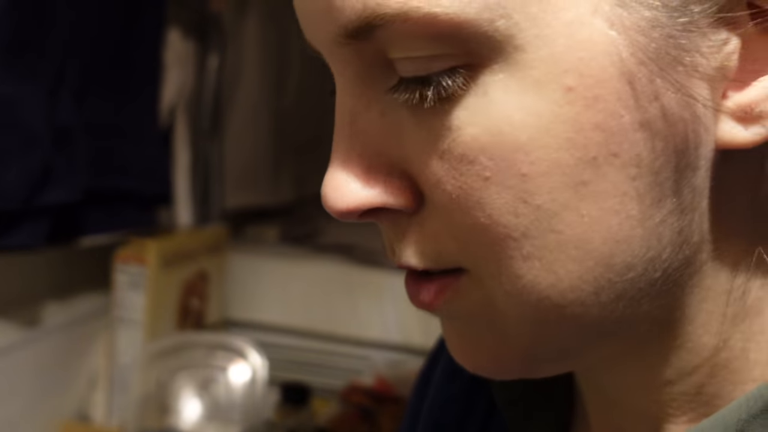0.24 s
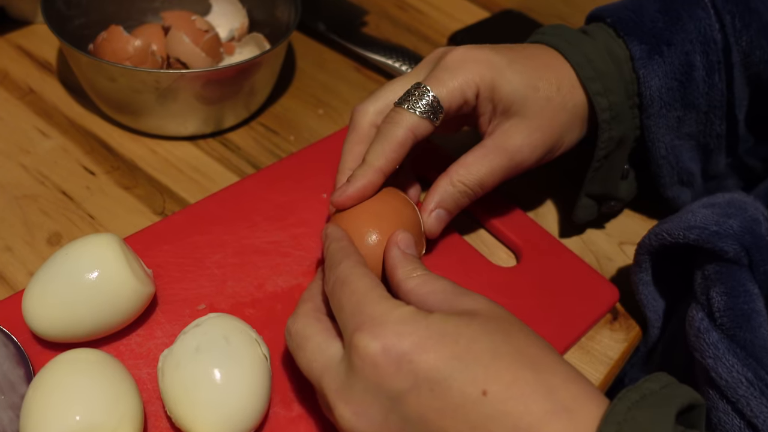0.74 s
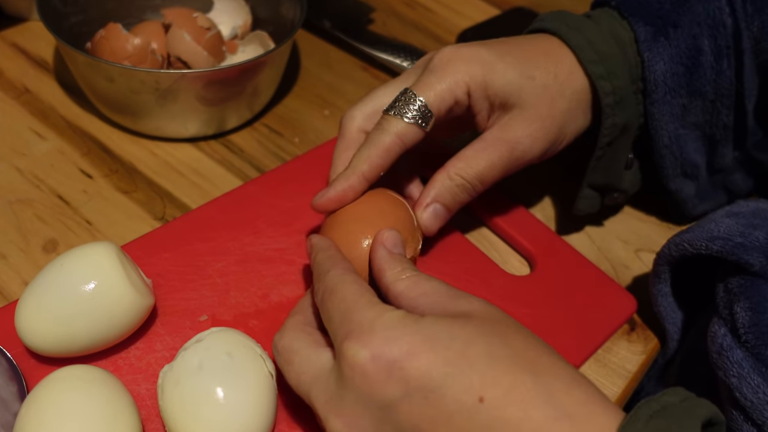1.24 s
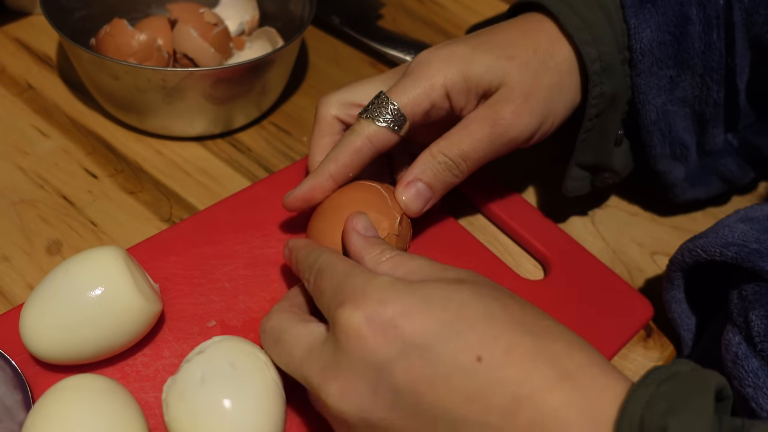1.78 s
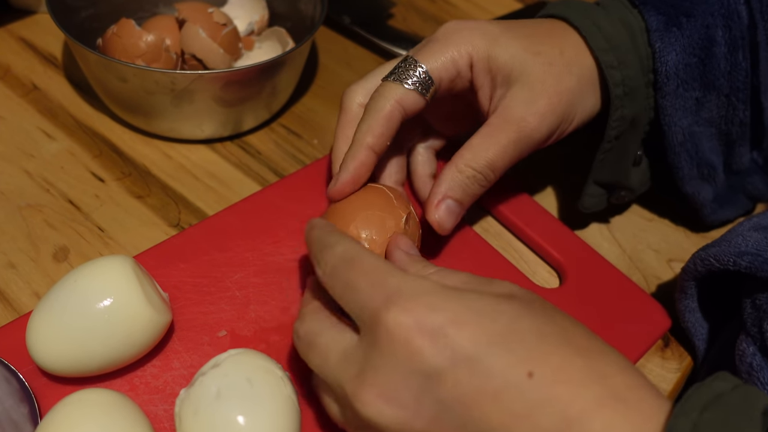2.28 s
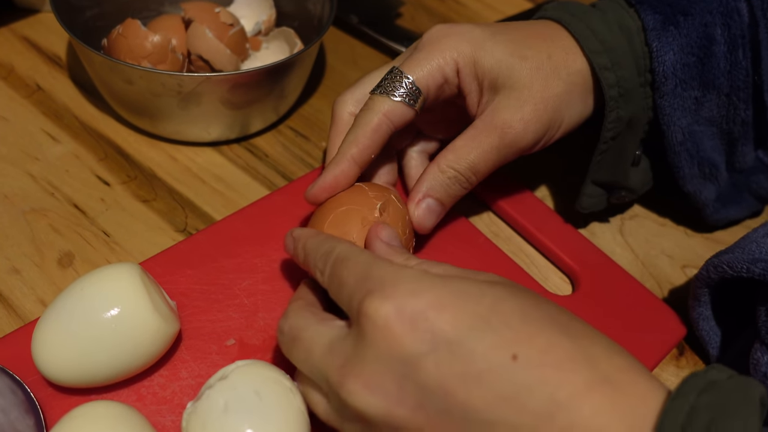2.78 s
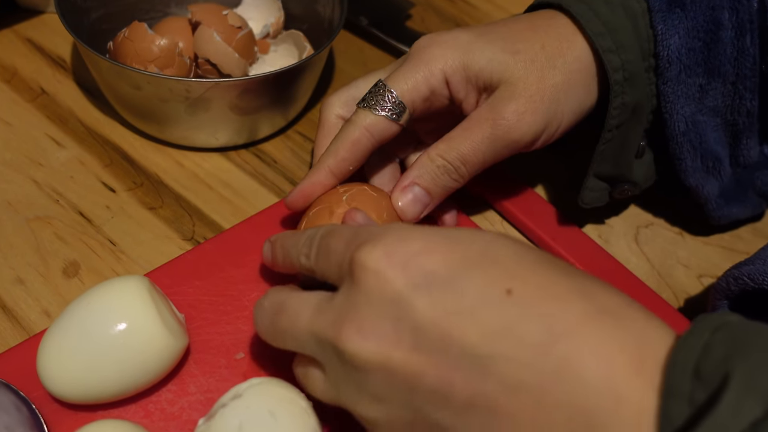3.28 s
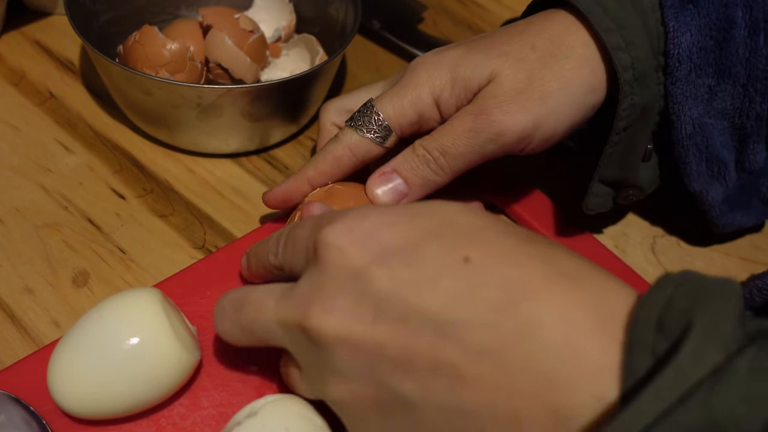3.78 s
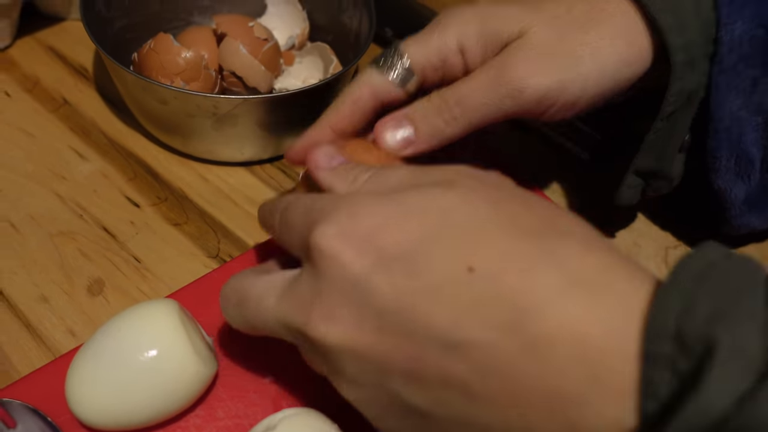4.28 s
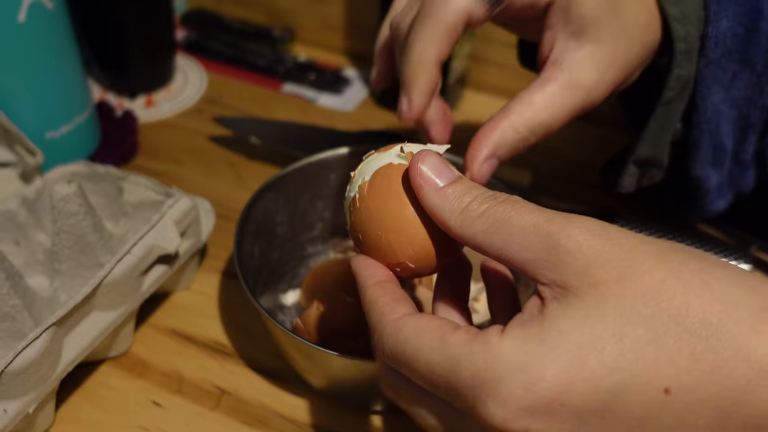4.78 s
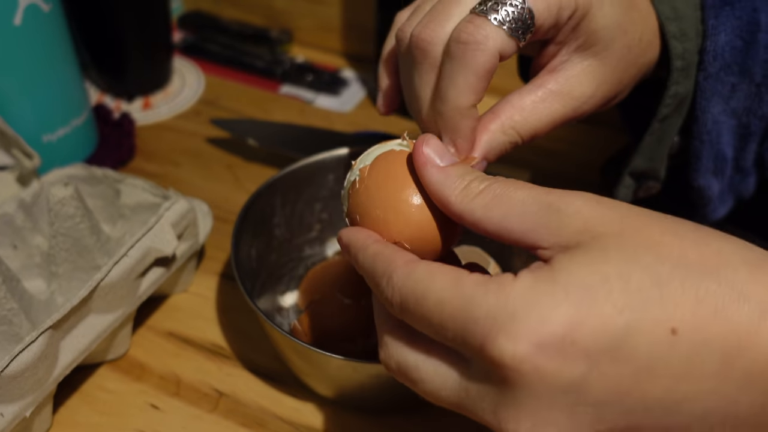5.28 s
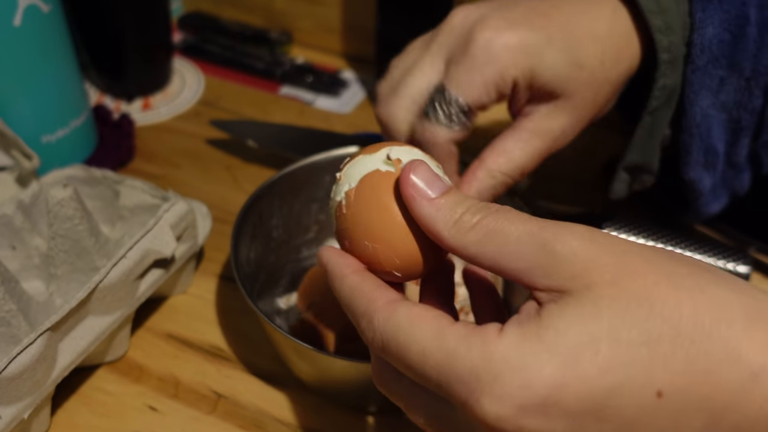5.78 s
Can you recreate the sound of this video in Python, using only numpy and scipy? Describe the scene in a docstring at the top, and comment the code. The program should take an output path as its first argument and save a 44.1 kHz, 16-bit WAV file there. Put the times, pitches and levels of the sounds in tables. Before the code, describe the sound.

Close, dry cracking of a hard-boiled eggshell pressed and rolled on a plastic board, with dull knocks, then delicate peeling ticks over low kitchen rumble.

```python
"""In a small kitchen a hard-boiled egg is pressed and rolled on a plastic cutting board. Its shell cracks in steps:
bursts of noise through the shell's resonances, with decaying sines for the knocked board and the thumped table.
Shell grinds and crunches as many tiny clicks, and one skid groans as a sine of uneven pitch. Then fingers peel
the shell off with thin ticks and small rips of filtered crackle. Filtered noise makes a low rumble and thin air,
and a wavering sine hums faintly. All sound drops out for a moment early on."""
import sys
import numpy as np
from scipy import signal
from scipy.fft import rfft, irfft, next_fast_len
from scipy.io import wavfile
from scipy.ndimage import uniform_filter1d, map_coordinates

SR = 44100
rng = np.random.default_rng(int(sys.argv[2]) if len(sys.argv) > 2 else 0)


def pcm_store(signal):
    """Save signal as 16-bit PCM."""
    levels = np.round(np.clip(np.atleast_2d(signal), -1, 1) * 32767)
    wavfile.write(sys.argv[1], SR, levels.astype(np.int16).T)


N = 266805
TIME = np.arange(N) / SR  # [s]
AGE = np.arange(8192) / SR  # time since a blow [s]
REFERENCE_DB = -30  # strength at which the snap and crunch levels are given

# breaks of the shell: (time [s], strength [dB], brightness [dB per octave])
BREAKS = [(0.1971, -48.5, -1.5), (0.265, -56.5, 7), (0.3184, -57, 11), (.5, -33.5, -6), (0.548, -54.5, 1.5),
          (0.648, -53, -2), (0.896, -49.5, 11), (0.9105, -30.5, -2), (.926, -29, 2.5), (.932, -35, 8.5),
          (0.9523, -36, 0.5), (0.9865, -42, 5.5), (1.0428, -56.5, 7.5), (1.1123, -21.5, -2),
          (1.1475, -38.5, -0.5), (1.1723, -45, 5.5), (1.1921, -28, -2.5), (1.1982, -34.5, 4),
          (1.212, -41.5, 6), (1.4147, -28, 1.5), (1.4269, -37, -2), (1.44, -32.5, -2), (1.4563, -35, -2),
          (1.4635, -33, 2), (1.6161, -56.5, 7.5), (1.6403, -50, 1.5), (1.6714, -49, 1.5), (1.6982, -58, -6),
          (1.7153, -47.5, -6), (1.766, -53.5, -1), (1.8091, -28.5, -2), (1.829, -35, -1.5),
          (1.8473, -48.5, 6), (1.8987, -37.5, -3.5), (2.3239, -55.5, -6), (2.373, -36, -1.5),
          (2.4633, -65, 13), (2.558, -44, 8.5), (2.6023, -43, 2), (2.6937, -25.5, 1.5), (2.7527, -32, 0),
          (2.7777, -58.5, 13.5), (2.829, -49.5, 10.5), (2.8613, -55, 4), (2.8957, -27.5, 0),
          (2.9022, -27, 2), (2.9913, -53, 5), (3.1181, -34, 3.5), (3.1206, -25, -0.5), (3.1793, -34.5, -1),
          (3.2195, -39, 0), (3.269, -48, 5), (3.2944, -25, -1.5), (3.3055, -35, 8), (3.396, -32.5, 1),
          (3.4106, -28.5, -3), (3.5198, -29.5, -1), (3.5486, -46.5, 10), (3.5959, -26.5, 2.5),
          (3.6621, -47, 4), (3.711, -44, 4), (3.7979, -34.5, 3.5), (3.8194, -29, 0), (3.8694, -32, 9),
          (3.8767, -30.5, -11), (3.976, -57.5, 7), (4.0106, -35.5, 3.5), (4.0527, -41.5, 6),
          (4.1019, -30, -0.5), (4.1195, -35.5, 6), (4.197, -52.5, 10.5)]
# the shell caves in and the egg sinks against the board: (time [s], level [dB])
CAVE_INS = [(.926, -24.5), (1.427, -26.5), (1.6716, -37), (1.813, -19.5), (2.697, -15.5), (3.18, -19),
            (3.408, -19), (3.6, -20), (3.664, -31.5), (3.875, -15), (4.119, -17)]
# the egg tips onto its side: (start [s], end [s])
TIPPING = (1.5, 2.6)
# sound of thin shell and membrane: (frequency [Hz], relative level [dB per Hz])
THIN_SHELL = [(3000, -22.5), (5000, -5), (5900, -5.5), (7100, 0), (8500, -4), (10000, -5), (11800, -3),
              (13500, -12), (16000, -20)]
# the moment without sound: (start [s], end [s])
DROPOUT = (.4445, .4865)


def amp(db):
    """Turn decibels into an amplitude factor."""
    return 10 ** (np.asarray(db) / 20)


def unit(x):
    """Scale a sound to an rms of 1."""
    return x / np.sqrt(np.mean(x ** 2) + 1e-20)


def early_unit(x, seconds):
    """Scale a blow to an rms of 1 over its first moments."""
    return x / np.sqrt(np.mean(x[:round(seconds * SR)] ** 2) + 1e-20)


def along(points, hz):
    """Read a curve of (frequency [Hz], value) points on a log frequency axis."""
    point_hz, value = np.transpose(points)
    return np.interp(np.log(hz + 1), np.log(point_hz + 1), value)


def wobble(rate):
    """A smooth random curve through this many random points a second."""
    points = rng.standard_normal(int(N * rate / SR) + 4)
    return map_coordinates(points, [TIME * rate])


def span(start, end, fade):
    """On between two times, with straight fades."""
    return np.clip(np.minimum(TIME - start, end - TIME) / fade, 0, 1)


def add(track, s, sound):
    """Mix a sound into the track at time s."""
    part = track[max(round(s * SR), 0):][:len(sound)]
    part += sound[:len(part)]


def colour(x, gain):
    """Filter with the given gain at each frequency, so that nothing sounds before its cause."""
    m = 2 * next_fast_len(len(x))
    log_gain = np.log(np.maximum(gain(np.fft.rfftfreq(m, 1 / SR)), 1e-6))
    cepstrum = irfft(log_gain)
    # folding the cepstrum forward in time gives the minimum-phase filter
    cepstrum[1:m // 2] *= 2
    cepstrum[m // 2 + 1:] = 0
    return irfft(rfft(x, m) * np.exp(rfft(cepstrum)), m)[:len(x)]


def crackle(gain, rate, spread_db):
    """Dense tiny breaks of uneven size, on average rate of them a second, with an rms of 1."""
    happens = rng.random(N) < rate / SR
    breaks = happens * rng.standard_normal(N) * amp(spread_db * rng.standard_normal(N))
    return unit(colour(breaks, gain))


def cracking():
    """The shell breaks step by step; each jolt reaches the board a moment later through the soft egg."""
    shell_db = 0.4
    knock_delay = 0.003514  # time a jolt takes through the egg [s]
    # a stronger, brighter break snaps harder: dB at the reference, dB per dB, dB per unit of brightness
    snap_base_db, snap_grows, snap_bright = -41, 0.97, 1
    # the board's answer over the strength of the break [dB]
    upright_db, rolling_db = -5.5, 3
    shell, board = np.zeros((2, N))
    for s, db, bright_db in BREAKS:
        snap_db = snap_base_db + snap_grows * (db - REFERENCE_DB) + snap_bright * bright_db
        add(shell, s, running_crack(db, bright_db, snap_db))
        knock_db = db + np.interp(s, TIPPING, [upright_db, rolling_db])
        add(board, s + knock_delay, amp(knock_db) * board_knock(s, attack=0.005, scatter_db=0.5))
    return amp(shell_db) * shell + board


def running_crack(db, bright_db, snap_db, count=2):
    """A crack runs on: a break, then smaller steps that follow it at uneven moments."""
    mean_wait, drop_db = .0045, 13.5  # between steps [s]; weaker by this much at each step
    out, when = np.zeros(len(AGE)), 0
    for step in range(count + 1):
        add(out, when, amp(-drop_db * step) * shell_click(db, bright_db, snap_db))
        when += mean_wait * (.5 + rng.random())
    return out


def shell_click(db, bright_db, snap_db):
    """One break: the shell rings briefly under the snap of its edge."""
    # sound of the snapping edge: (frequency [Hz], relative level [dB per Hz])
    snap_curve = [(2500, -46.5), (4000, 7.5), (4600, 7), (5100, 2.5), (5700, 7), (7200, 2.5), (8500, -2),
                  (12000, -9), (16000, -21.5)]
    ring_source = fracture(split_t60=0.00043, crumble_db=-3.5, crumble_t60=0.022)
    ring = colour(ring_source, lambda hz: shell_gain(hz, bright_db))
    snap_source = fracture(split_t60=0.0011, crumble_db=-9.5, crumble_t60=0.026)
    snap = colour(snap_source, lambda hz: amp(along(snap_curve, hz)))
    return amp(db) * early_unit(ring, 0.0038) + amp(snap_db) * early_unit(snap, 0.0045)


def fracture(split_t60, crumble_db, crumble_t60):
    """A split runs through the shell in an instant, and spiky crumbs follow it."""
    noise, spikes = rng.standard_normal((2, len(AGE)))
    split = amp(-60 * AGE / split_t60)
    crumbs = amp(crumble_db + 3.5 * spikes - 60 * AGE / crumble_t60)
    return noise * (split + crumbs)


def shell_gain(hz, bright_db=0):
    """The shell's resonances, a little different for each piece, with a tilt towards bright or dull."""
    # resonances of a typical piece: (frequency [Hz], width [Hz], relative level [dB])
    resonances = [(647, 130, -2.5), (1030, 220, -6.5), (1347, 100, 4), (1823, 110, 4.5), (2210, 410, 2),
                  (2920, 110, -4.5), (3265, 210, -2.5), (3660, 220, -8.5), (4270, 300, -18)]
    level_change, detune = rng.standard_normal((2, len(resonances), 1))
    centre, width, db = np.transpose(resonances)[:, :, None]
    offset = (hz ** 2 - (centre * (1 + .02 * detune)) ** 2) / (width * (hz + 1))
    power = np.sum(amp(db + 2 * level_change) ** 2 / (1 + offset ** 2), axis=0)
    tilt = amp(bright_db * np.log2(np.clip(hz, 1300, 3800) / 2300))
    return np.sqrt(power / (1 + (hz / 4800) ** 8)) * tilt


def board_knock(s, attack, scatter_db):
    """The soft egg pushes the board; how the egg lies decides which tones of the board answer."""
    # typical tones of the board:
    # (frequency [Hz], level under upright egg [dB], level under rolling egg [dB], time to fall 60 dB [s])
    board_modes = [(219, -5, -6, 0.055), (261.7, 1, 6, 0.034), (334.5, 3, -4.5, 0.038),
                   (398.4, 1, -7.5, 0.043), (482, -18, -23, 0.045), (664, -11.5, -20, 0.045)]
    hz, upright_db, rolling_db, t60 = np.transpose(board_modes)[:, :, None]
    rolled = np.interp(s, TIPPING, [0, 1])
    level_change, detune = rng.standard_normal((2, len(board_modes), 1))
    db = (1 - rolled) * upright_db + rolled * rolling_db + scatter_db * level_change
    tones = np.sin(2 * np.pi * hz * (1 + .03 * detune) * AGE)
    ringing = np.sum(amp(db - 60 * AGE / t60) * tones, axis=0)
    return early_unit(ringing * (1 - np.exp(-AGE / attack)), 0.0075)


def sinking():
    """Where the shell caves in, the whole egg knocks the board."""
    lag, knock_db = 0.00213, -2.5  # the board answers later [s], at this level over the sinking
    out = np.zeros(N)
    for s, db in CAVE_INS:
        add(out, s + lag, amp(db + knock_db) * board_knock(s, attack=0.0035, scatter_db=4.0))
    return out


def crunching():
    """While the egg sinks, many tiny pieces of shell give way at once."""
    base_db, grows = -56.5, .12  # level at the reference strength; dB per dB of the sinking
    half_length = 0.026  # [s]
    level = np.zeros(N)
    for s, db in CAVE_INS:
        swell = np.exp(-((TIME - s) / half_length - .5) ** 2)
        level += amp(base_db + grows * (db - REFERENCE_DB)) * swell
    return level * crackle(shell_gain, rate=1100, spread_db=6.5)


def thumping():
    """The table thumps when the egg sinks, and stirs a little at every break."""
    jolt_db = -5  # the table's answer over the strength of a break
    out = np.zeros(N)
    for s, db in CAVE_INS:
        add(out, s, amp(db) * table_thump())
    for s, db, _ in BREAKS:
        add(out, s, amp(db + jolt_db) * table_thump())
    return out


def table_thump(hz=104.5, swell=0.013, t60=0.094):
    """The heavy table top takes about a cycle to get going, then dies away; its pitch varies a little."""
    envelope = (1 - np.exp(-(AGE / swell) ** 3)) * amp(-60 * AGE / t60)
    pitch = hz * (1 + .05 * rng.standard_normal())
    return np.sqrt(2) * envelope / envelope.max() * np.sin(2 * np.pi * pitch * AGE)


def grinding():
    """Under the hands' pressure pieces of shell grind, skin rubs on shell and stray chips tick."""
    # how hard the hands work the egg on the board: (time [s], level [dB])
    hand_pressure = [(0.5, -78), (0.68, -70), (0.94, -78.5), (1.05, -64.5), (1.79, -68.5), (1.99, -75.5),
                     (2.56, -74), (2.8, -67), (2.97, -68.5), (3.76, -63), (3.95, -63.5), (4.4, -74.5)]
    grit_db, rub_db, rub_top_hz = -2.5, 5.5, 378
    chips_per_s, chip_db, chip_scatter_db = 14, 2.5, 2.5  # chip levels are over the pressure
    s, db = np.transpose(hand_pressure)
    pressure = amp(np.interp(TIME, s, db)) * span(s[0], s[-1], fade=0.033)
    grit = amp(grit_db) * crackle(shell_gain, rate=1450, spread_db=9.0)
    rub = amp(rub_db) * crackle(lambda hz: 1 / (1 + (hz / rub_top_hz) ** 3), rate=420, spread_db=4)
    out = pressure * (grit + rub)
    # one chip at a random moment in each slot
    for slot in np.arange(s[0], s[-1], 1 / chips_per_s):
        when = slot + rng.random() / chips_per_s
        level_db = np.interp(when, s, db) + chip_db + chip_scatter_db * rng.standard_normal()
        add(out, when, shell_click(level_db, bright_db=-1.5, snap_db=level_db))
    return out


def skidding():
    """The shell sticks and slips on the plastic at an uneven, mostly rising rate: a short groan."""
    # course of the skid, before its wobble: (time [s], slip rate [Hz], level [dB])
    skid_course = [(3.777, 226.5, -70), (3.795, 235, -39.5), (3.833, 289, -45.5), (3.854, 410, -34.5),
                   (3.885, 390, -49)]
    s, slip_hz, db = np.transpose(skid_course)
    rate = np.interp(TIME, s, slip_hz) * (1 + .22 * wobble(250))
    sliding = (TIME > s[0]) * (TIME < s[-1])
    level = amp(np.interp(TIME, s, db) + 2 * wobble(120)) * sliding
    return level * np.sqrt(2) * np.sin(2 * np.pi * np.cumsum(rate) / SR)


def peeling():
    """Fingertips pick at the rim, flakes snap off and the membrane lets go in short rips."""
    # fingertips working at the rim of the shell: (start [s], end [s])
    picking_times = [(4.42, 4.78), (5.0, 5.9)]
    # the membrane rips off the white: (time [s], length [s], crackle level [dB], fizz level [dB])
    membrane_rips = [(4.653, 0.053, -66, -62.5), (5.282, 0.015, -45.5, -39), (5.496, 0.031, -54.5, -52),
                     (5.628, 0.086, -69.5, -69.5), (5.719, 0.045, -54, -67.5)]
    # flakes snapped off in the hand: (time [s], level [dB], flake resonance [Hz])
    snapped_flakes = [(4.6399, -45, 6300), (4.6577, -43.5, 6290), (4.682, -55, 5000), (5.251, -54.5, 7200),
                      (5.2886, -38, 6950), (5.34, -63, 7100), (5.616, -50, 11400), (5.7276, -50.5, 7100),
                      (5.8213, -60, 7700), (5.9264, -49, 5870), (5.9956, -61.5, 7600)]
    # the smallest flakes hardly stir the egg: (flake resonance [Hz], change of the egg's level [dB])
    egg_stir = [(7500, -3.5), (11500, -34)]
    picking_db, picking_fade = -82.5, 0.096  # typical level; fade [s]
    swing_db, swings_per_s = 5, 35  # the fingertips catch and let go: depth and rate
    hollow_db, hollow_top_hz = 11, 400  # the hollow of egg and hand sounds in a rip

    def membrane(hz):
        """The thin, high sound of shell and membrane."""
        return amp(along(THIN_SHELL, hz))

    def hollow(hz):
        """The bright shell together with the low hollow of egg and hand."""
        return shell_gain(hz, bright_db=4) + amp(hollow_db) / (1 + (hz / hollow_top_hz) ** 3)

    picking = sum(span(start, end, picking_fade) for start, end in picking_times)
    catching = amp(picking_db + swing_db * wobble(swings_per_s))
    out = picking * catching * crackle(membrane, rate=2160, spread_db=4)
    body = crackle(hollow, rate=2000, spread_db=3)
    fizz = crackle(membrane, rate=1300, spread_db=3.5)
    for s, length, body_db, fizz_db in membrane_rips:
        pull = np.exp(-(2 * (TIME - s) / length - 1) ** 4)
        out += pull * (amp(body_db) * body + amp(fizz_db) * fizz)
    for s, db, flake_hz in snapped_flakes:
        add(out, s, flake_snap(db + along(egg_stir, flake_hz), db, flake_hz))
    return out


def flake_snap(db, snap_db, flake_hz):
    """A flake held in the fingers breaks with one high, short resonance and a soft tap in the egg."""
    def resonance(hz):
        """Thin shell with a peak at the flake's own pitch."""
        return amp(along(THIN_SHELL, hz)) * (1 + 2.9 / (1 + ((hz - flake_hz) / 600) ** 2))

    def egg_tap(hz):
        """Bright shell resonances over a soft low tap."""
        return shell_gain(hz, bright_db=8.5) + 0.5 / (1 + (hz / 650) ** 4)

    breaking = fracture(split_t60=.006, crumble_db=-9, crumble_t60=.028)
    tap = early_unit(colour(breaking, egg_tap), 0.0031)
    snap = early_unit(colour(breaking, resonance), 0.0033)
    return amp(db) * tap + amp(snap_db) * snap


def kitchen(x):
    """Near walls give a short answer, each frequency dying at its own speed."""
    # how long the room rings: (frequency [Hz], time to fall 60 dB [s])
    room_decay = [(100, 0.14), (500, 0.11), (2000, 0.072), (6000, 0.09), (15000, .07)]
    hz, t, cells = signal.stft(rng.standard_normal(SR // 2), SR, nperseg=256)
    fading = amp(-60 * t / along(room_decay, hz)[:, None])
    tail = signal.istft(cells * fading, SR, nperseg=256)[1]
    tail = np.pad(tail, (round(0.0056 * SR), 0))  # the answer starts a little late
    return signal.fftconvolve(x, tail / np.linalg.norm(tail))[:N]


def room_tone():
    """A low rumble and thin air of filtered noise, and an appliance's hum as a wavering sine."""
    # low rumble of the room: (frequency [Hz], relative level [dB per Hz])
    rumble_curve = [(10, -3), (20, 7), (37, 0), (50, 5), (63, -16), (87, 0), (110, -6.5), (150, -16),
                    (185, -18), (215, -23), (290, -27), (400, -36.5), (800, -99)]
    # air of the room: (frequency [Hz], relative level [dB per Hz])
    air_curve = [(150, -13), (450, 0), (700, 8), (1100, -3), (1900, -5.5), (2700, -8.5), (2950, -13.5),
                 (3080, -1.5), (3250, -10), (4500, -14.5), (7000, -15), (9000, -19), (16000, -22)]
    # hum of an appliance, before its wavering: (start [s], end [s], frequency [Hz], level [dB])
    appliance_hum = [(0, 4.37, 114.5, -52), (4.372, 6.05, 127.2, -51)]
    opening = TIME < DROPOUT[0]
    rumble_db = -39.5 + 5 * opening  # both noises are louder before the dropout
    air_db = -71.5 + 5.5 * opening

    def noise(curve):
        """Steady noise with the given spectrum."""
        return unit(colour(rng.standard_normal(N), lambda hz: amp(along(curve, hz))))

    out = amp(rumble_db) * noise(rumble_curve) + amp(air_db) * noise(air_curve)
    for start, end, hz, db in appliance_hum:
        level = span(start, end, .03) * amp(db + 2 * wobble(3))
        out += level * np.sqrt(2) * np.sin(2 * np.pi * hz * TIME + wobble(5))
    return out


def scene():
    """The egg sounds close by, with a little of the kitchen around it; both channels are alike."""
    egg = cracking() + sinking() + skidding() + peeling() + crunching() + grinding()
    low = room_tone() + thumping()
    mono = egg + amp(-13.5) * kitchen(egg) + low
    return np.array([mono, mono])


def record(dry):
    """The sound drops out for a moment early on; nothing passes above the band limit."""
    top_hz = 15950
    live = (TIME < DROPOUT[0]) | (TIME > DROPOUT[1])
    gated = dry * uniform_filter1d(live * 1., size=64)  # soft edges, 64 samples long
    m = next_fast_len(N + SR // 2)
    passes = np.fft.rfftfreq(m, 1 / SR) < top_hz
    return irfft(rfft(gated, m) * passes, m)[:, :N]


dry = scene()
out = record(dry)
pcm_store(out)
```